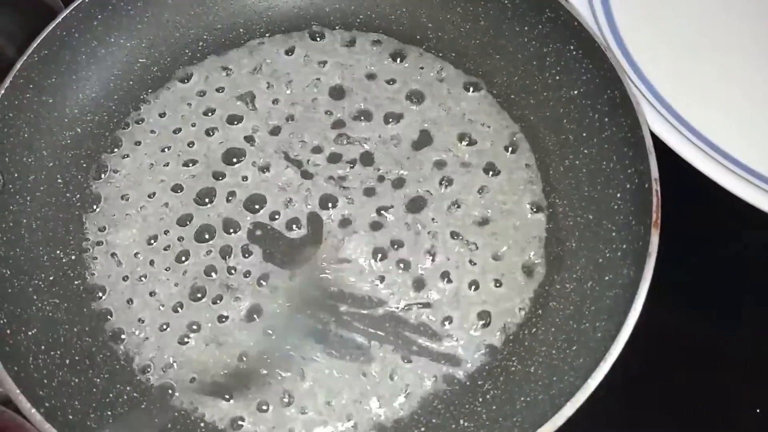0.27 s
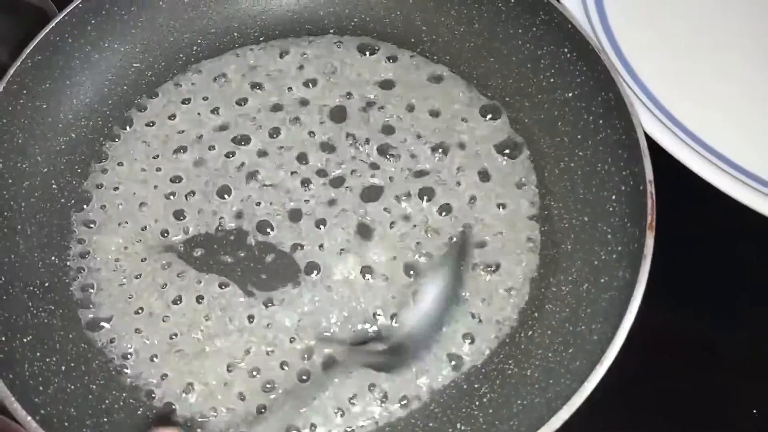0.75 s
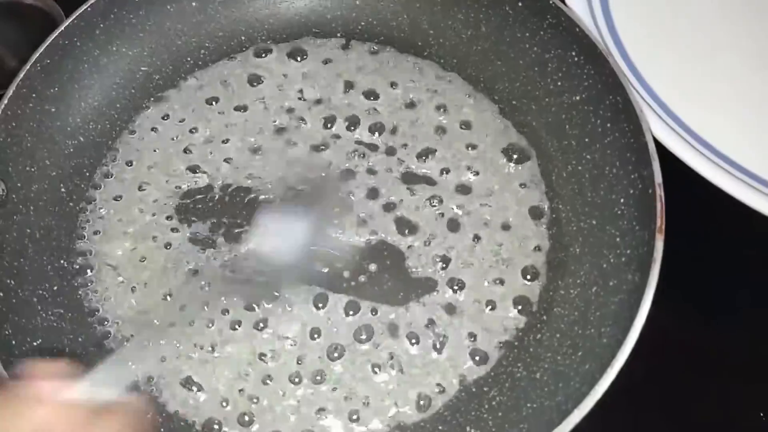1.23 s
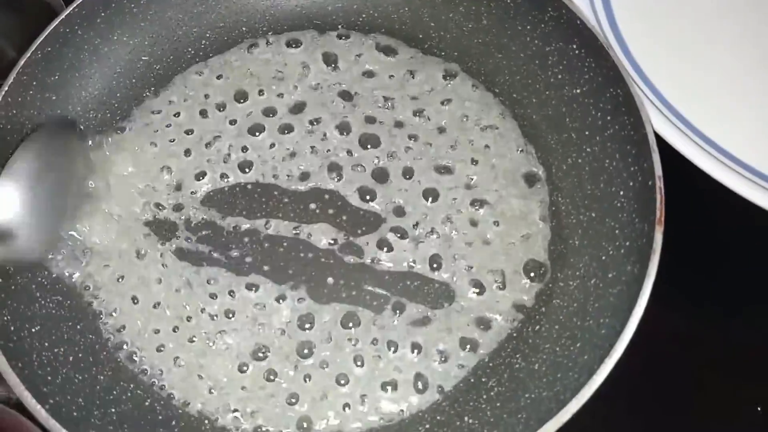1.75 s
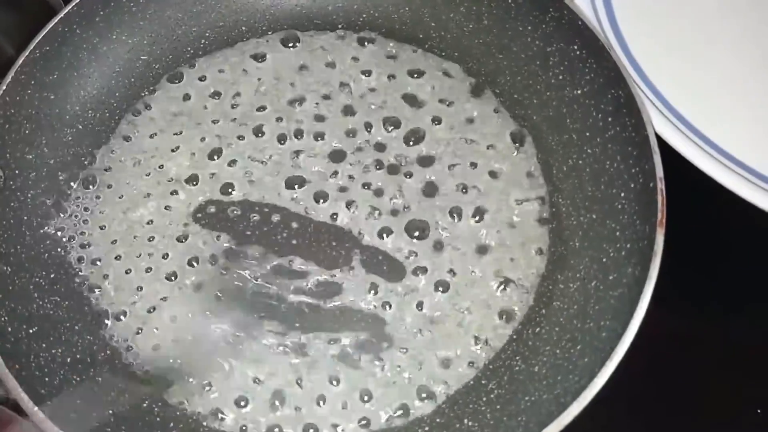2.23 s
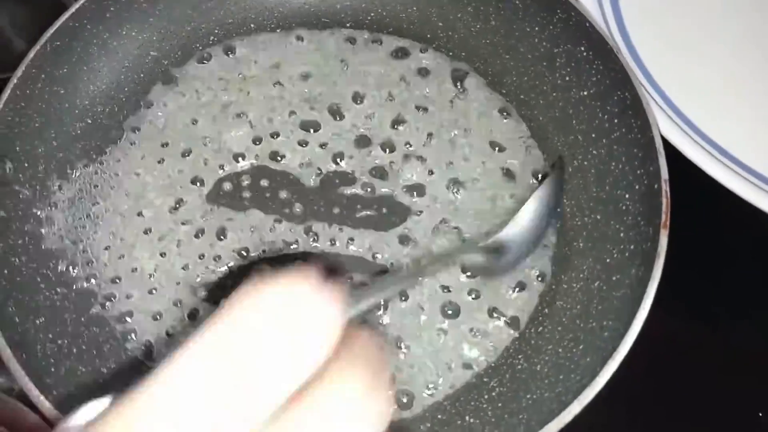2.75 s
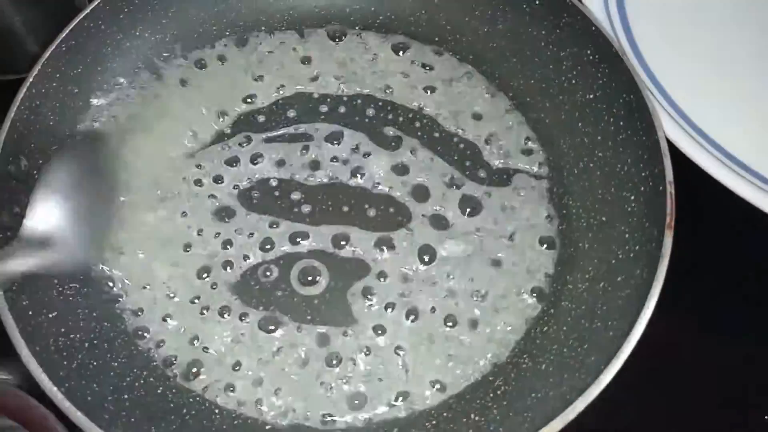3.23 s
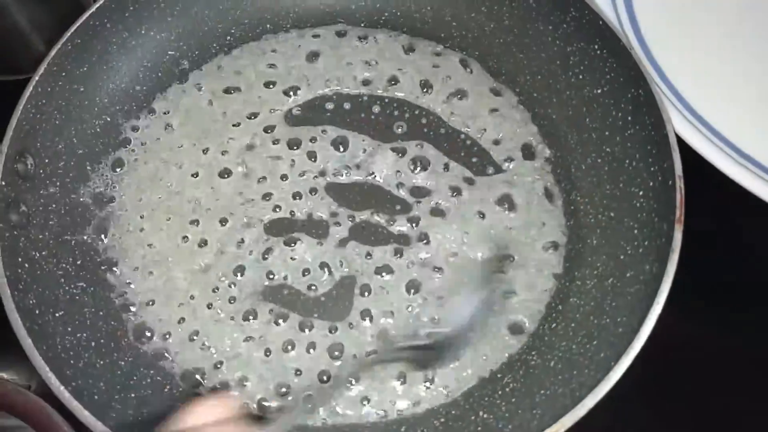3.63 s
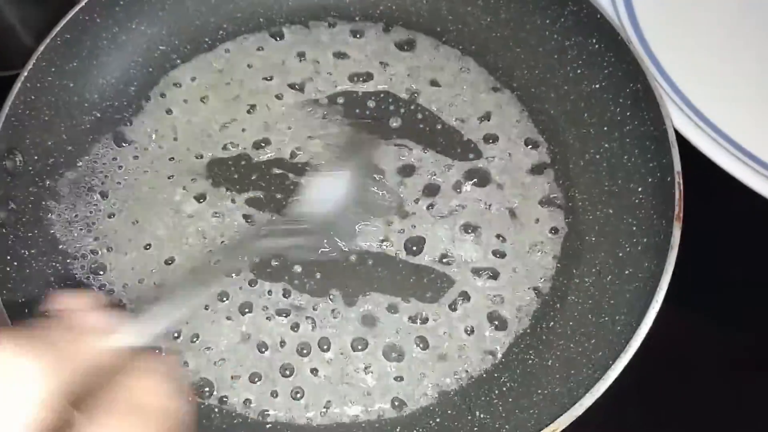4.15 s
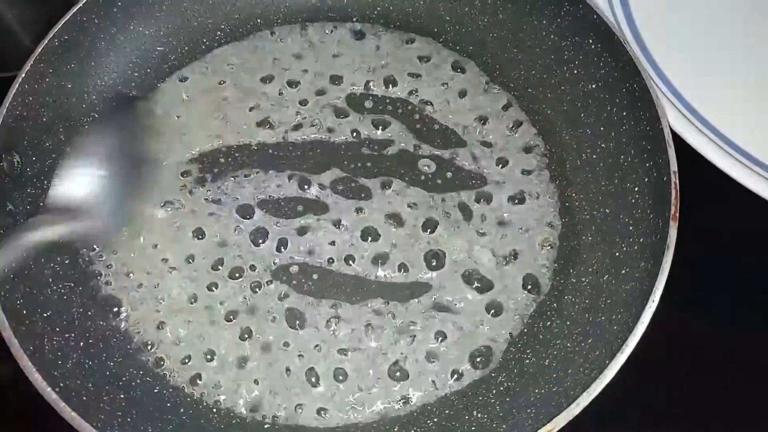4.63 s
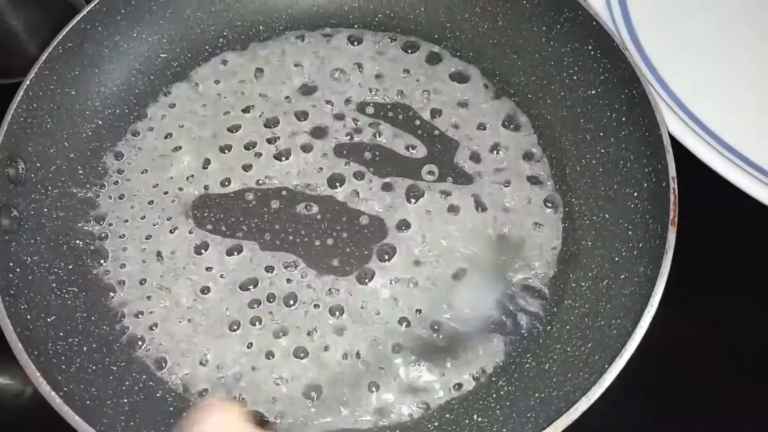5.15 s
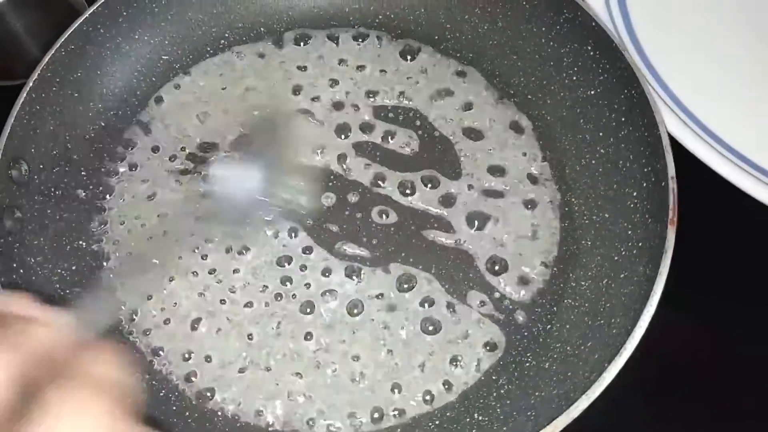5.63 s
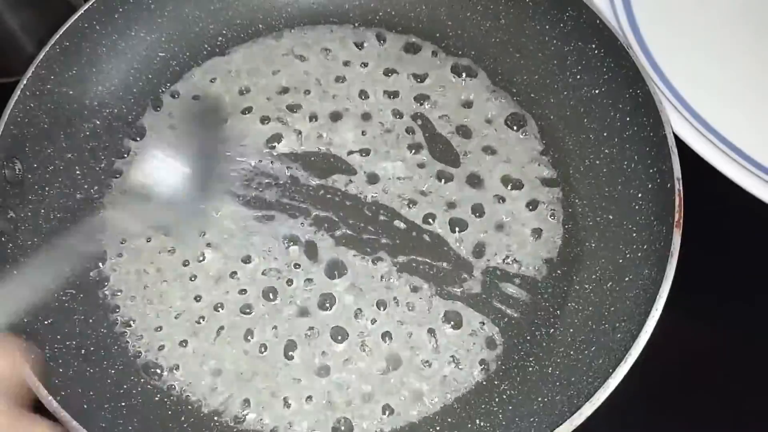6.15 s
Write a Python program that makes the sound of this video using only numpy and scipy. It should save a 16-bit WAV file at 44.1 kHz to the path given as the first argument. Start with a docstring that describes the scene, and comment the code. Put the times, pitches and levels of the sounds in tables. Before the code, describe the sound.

Fine bubbling sizzle runs throughout, with small pops. After a brief moment alone, it is joined by quick rhythmic spoon strokes: metallic ticks, hollow pan clacks and gritty rubbing, some firmer than others. Brittle grains tick under the spoon's edge. Near the end comes a rapid rattling judder, then more strokes. Close mono microphone, small room with very short reflections, little bass.

```python
"""Sugar syrup boils in a nonstick pan in a small kitchen, heard from close above in mono.
From the start countless tiny bubbles, modelled as filtered random clicks, burst in a steady sizzle. From 0.17 s,
about three times a second, a metal spoon lands on the pan or is dragged across it: blows and friction excite the
damped modes of pan and spoon. Sugar grains crack from 0.3 to 4.6 s, syrup on bared hot metal flares up
near 1.0, 1.9, 4.9, 5.1 and 5.6 s, and at 5.5 s the spoon judders down the pan wall."""
import sys
import numpy as np
from scipy import signal
from scipy.fft import rfft, irfft
from scipy.io import wavfile
from scipy.ndimage import uniform_filter1d, minimum_filter1d

SR = 44100
rng = np.random.default_rng(int(sys.argv[2]) if len(sys.argv) > 2 else 0)


def file_out(sig):
    """Save sig as 16-bit WAV at sys.argv[1]."""
    # one column per channel
    cols = np.atleast_2d(sig).T
    # limit, then scale
    lim = np.clip(cols, -1, 1)
    pcm = np.round(lim * 32767).astype(np.int16)
    wavfile.write(sys.argv[1], SR, pcm)


N = 281358  # samples

# In all tables levels are relative: sums, normalization and mixing gains follow.

# Spoon landings. Each row: start in seconds, pan thud in dB, wall clack in dB, spoon crack in dB,
# spoon ring in dB, chatter decay time (t60) in seconds.
LANDINGS = [(0.172, -24, -25, -1.5, -24, 0.022), (.511, -23.5, -26, -10, -16, 0.12),
            (.839, -8.5, -14, -8.5, -27, 0.036), (1.156, -14, -9, -4, -17, 0.029),
            (1.49, -13, -3, -33, -39, 0.01), (1.862, -20, -25, -7.5, -23, 0.073),
            (2.825, -1.5, -5, -2, -27, 0.0063), (4.012, -20, -33, -3.5, -11, 0.028),
            (4.316, -20, -13.5, -4.5, -18, 0.031), (4.743, -10, -43, -6, -25, 0.019),
            (5.118, -23, -30, 2.5, -13, 0.022), (5.560, -29, -38, -4, -10.5, 0.024),
            (5.921, -26.5, -23, -5, -11.5, 0.03), (6.327, -16, -12, -5.5, -14, 0.026)]
# Spectrum of the clack on the pan wall. Each row: frequency in Hz, spectral density in dB.
WALL_CLACK = [(70, -58), (220, -22), (1100, -24), (1400, 6), (1600, 3.5), (1900, -8), (2350, 4.5),
              (2800, -26), (3500, -2), (4200, -41), (9000, -44)]


def tapping(buzz_t60=0.31):
    """Impact excitation: each landing shares its blow between floor, wall and spoon, which buzzes on as it settles."""
    s, thud_db, clack_db, crack_db, ring_db, t60 = np.transpose(LANDINGS)
    thud = pan(contacts(zip(s, thud_db, t60), clean=0.11))
    clack = through(contacts(zip(s, clack_db, t60), clean=0.75), snap(WALL_CLACK))
    crack = spoon(contacts(zip(s, crack_db, t60)))
    # held loosely, the spoon chatters for longer than the landing itself
    buzz = contacts([(at, db, buzz_t60) for at, db in zip(s, ring_db)], clean=0.1)
    settling = through(buzz, ringing(SPOON_MODES))
    return thud + clack + crack + settling


# Strokes of the spoon across the pan. Each row: start in seconds, push in seconds, friction in dB,
# pan shudder in dB, extra sizzle in dB.
STROKES = [(0.176, .11, -29, -43, -25.5), (0.514, 0.063, -29, -43, -22), (.845, 0.085, -21.5, -37.5, -23.5),
           (1.158, 0.077, -22, -44.5, -20.5), (1.496, 0.12, -19, -41, -26), (1.864, .06, -26, -37, -22.5),
           (2.159, .11, -16.5, -39, -20.5), (2.473, 0.093, -22.5, -37, -22), (2.828, 0.26, -19, -38, -26),
           (3.290, 0.091, -26, -50.5, -28), (3.668, 0.14, -17, -37.5, -21), (4.020, 0.077, -24, -39.5, -39),
           (4.374, .18, -16, -41.5, -17.5), (4.746, .10, -20, -34.5, -22), (5.166, 0.13, -18, -37.5, -24.5),
           (5.565, .11, -25, -45.5, -24), (5.932, .15, -21, -42.5, -26.5), (6.328, 0.13, -19, -36, -8)]
# Brief catches of the dragged spoon. Each row: time in seconds, level in dB.
CATCHES = [(.606, -13), (1.520, -22), (1.918, -13.5), (2.188, -17), (4.768, -13), (4.837, -12),
           (5.661, -12)]
# Judder of the spoon down the pan wall. Each row: time in seconds, level in dB, decay time (t60) in seconds.
JUDDER = [(5.459, -7.5, 0.057), (5.468, -9, 0.1), (5.488, -7.5, 0.072), (5.503, -10.5, 0.074),
          (5.514, -3.5, 0.027), (5.523, -10, 0.23), (5.545, -19, 0.085)]
# Spectrum of the rasp on the wall. Each row: frequency in Hz, spectral density in dB.
WALL_RASP = [(100, -36), (500, -9.5), (1100, -13.5), (1500, 3), (2000, 0), (2550, 7), (3300, -9),
             (3900, 4.5), (5500, 1), (6600, -0.5), (7800, -28), (10000, -28), (16000, -38)]
# Modes of the whole pan on its support. Each row: frequency in Hz, energy in dB, decay time (t60) in seconds.
HOB_MODES = [(150, -27, 0.13), (187, -25, 0.12), (241.9, -12, 0.42), (298.6, -1.5, 0.29), (318, -5.5, 0.3),
             (404, -13, 0.2), (528, -9, 0.17)]
# friction grows as the spoon is pushed and dies as it lifts
BITE_S, PUSH_RISE_DB, LIFT_DB_PER_S = 0.0041, 14, 191
# the shudder eases slightly during the push and dies as the weight comes off
LOAD_S, LOAD_RISE_DB, UNLOAD_DB_PER_S = 0.01, -2.5, 152
# the boiling itself keeps the pan faintly ringing
PAN_IDLE_DB = -47.5


def dragging():
    """Stick-slip friction: random slips drive the pan's shell, while the spoon's weight shakes the pan on the hob."""
    _, _, friction_db, shudder_db, _ = np.transpose(STROKES)
    stroke_pressure = stroke_gain(friction_db, BITE_S, PUSH_RISE_DB, LIFT_DB_PER_S)
    pressure = np.hypot(stroke_pressure, from_db(PAN_IDLE_DB))
    weight = stroke_gain(shudder_db, LOAD_S, LOAD_RISE_DB, UNLOAD_DB_PER_S)

    slips = .85 * crackle(per_s=160, spread_db=1.5)
    rubbing = crackle(per_s=3000, spread_db=0.6)
    friction = (rubbing + slips) * pressure * from_db(-3 + 2.0 * drift(48))
    friction = friction + contacts([(s, db, .03) for s, db in CATCHES], clean=0.3)

    rumble = from_db(-2.0) * through(friction, snap(PAN_THUD))
    rings = from_db(-8.0) * wandering(friction, PAN_MODES, wander_db=3.0, rate=4.7)
    spoon_scrape = from_db(-11.5) * spoon(friction)
    # each mode of the supported pan gets its own random drive
    shudder = sum(from_db(db) * resonate(crackle(per_s=980, spread_db=2.0) * weight, hz, t60)
                  for hz, db, t60 in HOB_MODES)
    judder = through(contacts(JUDDER), snap(WALL_RASP))
    return rumble + rings + spoon_scrape + shudder + judder


def stroke_gain(levels_db, attack_s, rise_db, release_db_per_s):
    """Incoherent summation: strokes set in fast, move by rise_db to their level, then decay; their powers add."""
    age, power = np.arange(SR) / SR, np.zeros(N + SR)
    for (start, push_s, *_), level_db in zip(STROKES, levels_db):
        push_db = -rise_db * np.clip(1 - age / push_s, 0, 1) ** 1.1
        release_db = -release_db_per_s * np.maximum(age - push_s, 0)
        attack = np.clip(age / attack_s, 0, 1)
        first = round(start * SR)
        power[first:first + SR] += (attack * from_db(level_db + push_db + release_db)) ** 2
    return np.sqrt(power[:N])


# Spectrum of the pan's dull thud. Each row: frequency in Hz, spectral density in dB.
PAN_THUD = [(60, -82), (130, -70), (200, -56), (330, -38), (580, -15), (760, 4), (1150, 2.5), (1550, 7),
            (1950, -8.5), (2300, 9.5), (2700, -25), (5500, -48.5), (7000, -44), (9000, -96)]
# Modes of the pan's ringing shell. Each row: frequency in Hz, energy in dB, decay time (t60) in seconds.
PAN_MODES = [(710, -21.5, .12), (732.7, 2.5, 0.16), (763, -2, 0.18), (799.4, -2, 0.15), (844, -4, 0.066),
             (926.5, -3.5, 0.22), (1486, -33.5, 0.24), (1503, -8, 0.11), (1570, -10.5, 0.12),
             (2013, -33, 0.17), (2309, -3, 0.13), (2490, -11.5, .15), (2900, -14, 0.31), (3447, -8, 0.038)]


def pan(force, ring_db=7.5):
    """Modal superposition: the pan answers a force with a dull thud and its ringing modes."""
    return through(force, unit_energy(snap(PAN_THUD) + from_db(ring_db) * ringing(PAN_MODES)))


# Spectrum of the spoon's bright crack. Each row: frequency in Hz, spectral density in dB.
SPOON_CRACK = [(70, -53), (220, -32), (700, -25.5), (3000, -14.5), (4100, -4.5), (4700, 3.5), (5700, 4.5),
               (6600, 0), (7400, -17), (9000, -27), (14000, -30), (15500, -29)]
# Modes of the spoon's bowl and handle. Each row: frequency in Hz, energy in dB, decay time (t60) in seconds.
SPOON_MODES = [(4330, -7.5, 0.27), (4855, 7, 0.19), (4753, -7.5, 0.15), (5380, 5.5, 0.12),
               (5650, -4.5, 0.14), (5790, -34, 0.037), (5750, 2, 0.11), (6640, -3, 0.072),
               (6970, -12.5, 0.12), (7100, -55, 0.037), (8700, -55, 0.14)]


def spoon(force, ring_db=-11.0):
    """Modal superposition: the spoon answers with a bright crack and a short ring, damped by the hand."""
    return through(force, unit_energy(snap(SPOON_CRACK) + from_db(ring_db) * ringing(SPOON_MODES)))


# Sugar grains under the spoon's edge. Each row: time in seconds, crack level in dB.
GRAINS = [(.316, -18.5), (.996, -18), (1.629, -21), (2.248, -13), (3.147, -16), (3.588, -14), (3.608, -19),
          (3.639, -13), (3.708, -16.5), (3.784, -16), (3.795, -11.5), (4.083, -29), (4.134, -19),
          (4.590, -17), (4.607, -17.5)]
# Modes of the spoon's thin edge. Each row: frequency in Hz, energy in dB, decay time (t60) in seconds.
EDGE_MODES = [(8800, -20, .07), (9920, -10.5, 0.18), (10920, -4.5, 0.066), (11900, -22, .06),
              (12230, -3.5, 0.1), (12300, -26, .1), (13044, -9, 0.14), (14600, -5, .07),
              (15095, -17, 0.073), (15490, 3, .07)]
# Spectrum of the edge's scratch. Each row: frequency in Hz, spectral density in dB.
EDGE_SCRATCH = [(6000, -47), (8500, -2), (10500, 2), (12500, 9), (13800, -7), (15300, 4.5)]
# how strongly a grain's crack drives the spoon's bowl, and a landing its edge
GRAIN_TO_BOWL_DB, LANDING_TO_EDGE_DB = 7.5, -23


def grains():
    """Brittle fracture: grains crack and crumble, so the edge scratches and tinkles; landings make it tinkle too."""
    crack = contacts([(s, db, .012) for s, db in GRAINS], clean=0.31)
    crumble_force = contacts([(s, db - 11.5, .13) for s, db in GRAINS])
    crumble = crumble_force * crackle(per_s=2900, spread_db=5.0)
    landing = contacts([(s, crack_db + LANDING_TO_EDGE_DB, t60) for s, _, _, crack_db, _, t60 in LANDINGS])

    tinkle = from_db(-9.5) * wandering(crack + crumble + landing, EDGE_MODES, wander_db=5.5, rate=15)
    scratch = from_db(-6.5) * through(crack + crumble, snap(EDGE_SCRATCH))
    bowl = from_db(GRAIN_TO_BOWL_DB) * spoon(crack, ring_db=10.0)
    return tinkle + scratch + bowl


# Spectrum of the bursting bubbles. Each row: frequency in Hz, spectral density in dB.
BUBBLES = [(120, -93), (300, -83), (500, -22.5), (750, -15), (1200, -12.5), (1600, -7), (3300, -8),
           (4700, 0.5), (5700, 4), (6400, -1), (7200, -13), (8400, -29.5), (12500, -28.5), (14000, -27.5),
           (15400, -19)]
# Spectrum of syrup spread on hot metal. Each row: frequency in Hz, spectral density in dB.
FRESH_SYRUP = [(1200, -42), (2500, -4.5), (3050, 7.5), (3450, 12), (3950, 7), (4700, -4), (8000, -31)]
# the syrup simmers evenly, and is stirred into a livelier sizzle that soon calms down
SIMMER_DB, STIR_S, STIR_RISE_DB, CALM_DB_PER_S = -24, 0.0066, 11.5, 44


def syrup():
    """Shot noise: random bursts make a fine fizz with sparser, larger pops; spread syrup flares up at a lower pitch."""
    pops = crackle(per_s=450, spread_db=2.4)
    fizz = crackle(per_s=9000, spread_db=2.0)
    stirred = stroke_gain([sizzle_db for *_, sizzle_db in STROKES], STIR_S, STIR_RISE_DB, CALM_DB_PER_S)
    liveliness = np.hypot(from_db(SIMMER_DB), stirred) * from_db(1.1 * drift(17))
    bursts = (fizz + from_db(-9.5) * pops) * liveliness
    flare = crackle(per_s=7800, spread_db=2.0) * flare_gain()
    return from_db(-1.5) * through(bursts, snap(BUBBLES)) + through(flare, snap(FRESH_SYRUP))


# Flares of syrup on bare hot metal. Each row: loudest moment in seconds, time from there
# to about 11.5 dB lower in seconds, level in dB.
FLARES = [(1.01, 0.22, -23), (1.92, 0.26, -28), (4.87, 0.18, -25), (5.09, 0.091, -23), (5.63, 0.087, -27)]


def flare_gain():
    """Amplitude modulation: each flare swells and fades along a bell-shaped hyperbolic secant."""
    t = np.arange(N) / SR
    return sum(from_db(db) / np.cosh((t - s) / width_s * 2) for s, width_s, db in FLARES)


def kitchen(x, t60=0.12, wet_db=-13.5):
    """Diffuse reverberation: dulled, decaying noise stands for short reflections from worktop and walls."""
    dull = signal.butter(1, 6000, fs=SR, output="sos")
    tail = signal.sosfilt(dull, rng.standard_normal(SR // 2) * dying(t60))
    tail[:SR // 250] = 0  # reflections start 4 ms after the direct sound
    return x + from_db(wet_db) * through(x, unit_energy(tail))


def contacts(rows, clean=0.0089):
    """Chattering impact: each row (s, dB, t60) is a dying flurry of micro-contacts led by one clean blow.

    The share `clean` of the energy sets the leading blow."""
    force, clean = np.zeros(N + SR), np.clip(clean, 0, 1)
    for s, level_db, t60 in rows:
        blow = np.sqrt(1 - clean) * dying(t60) * rng.choice([-1, 1], SR // 2)
        blow[0] += np.sqrt(clean * np.sum(dying(t60) ** 2))
        start = max(round(s * SR), 0)
        force[start:start + SR // 2] += from_db(level_db) * blow
    return force[:N]


def crackle(per_s, spread_db):
    """Poisson-like impulse noise: random clicks, many small and a few large, scaled to an rms of 1."""
    excess = np.minimum(rng.exponential(1, N), 4.5)
    sizes = from_db(spread_db * excess) * rng.choice([-1, 1], N)
    return rms_one(sizes * (rng.random(N) < per_s / SR))


def wandering(force, modes, wander_db, rate):
    """Position-dependent excitation: a moving contact crosses the nodes and bellies of each mode."""
    return sum(from_db(db) * resonate(force * from_db(wander_db * drift(rate)), hz, t60)
               for hz, db, t60 in modes)


def resonate(x, hz, t60):
    """Damped oscillator: one mode of about unit energy, then confined to the band near its own pitch."""
    r, w = np.exp(-np.log(1000) / t60 / SR), 2 * np.pi * hz / SR
    drive = np.sqrt(2 * (1 - r * r)) * np.sin(w)
    swing = signal.lfilter([drive], [1, -2 * r * np.cos(w), r * r], x + 1e-18)
    band = [hz / 1.3, min(hz * 1.3, .45 * SR)]
    return signal.lfilter(*signal.butter(1, band, "band", fs=SR), swing)


def ringing(modes):
    """Modal superposition: the impulse response of a set of modes, at unit energy."""
    click = signal.unit_impulse(SR // 2)
    return unit_energy(sum(from_db(db) * resonate(click, hz, t60) for hz, db, t60 in modes))


def snap(colour, size=4096):
    """Minimum phase: the most compact causal impulse response with this spectrum, by folding the cepstrum."""
    hz, level_db = np.transpose(colour)
    bins = np.maximum(np.arange(size // 2 + 1) * SR / size, 1)
    magnitude = from_db(np.interp(np.log(bins), np.log(hz), level_db))
    cepstrum = irfft(np.log(magnitude))
    cepstrum[1:size // 2] *= 2
    cepstrum[size // 2 + 1:] = 0
    response = irfft(np.exp(rfft(cepstrum)))
    return unit_energy(np.pad(response, (0, SR // 2 - size)))


def drift(rate):
    """Low-pass noise: smooth chance with a spread of 1, changing about rate times a second."""
    r = np.exp(-80 * np.pi * rate / SR)  # one step lasts 40 samples
    steps = rng.standard_normal(N // 40 + 2002)
    slow = signal.lfilter([1], [1, -2 * r, r * r], steps)[2000:]  # skip the filter's start-up
    return np.interp(np.arange(N) / 40, np.arange(len(slow)), rms_one(slow))


def dying(t60):
    """Exponential decay: half a second that falls by 60 dB in t60 seconds."""
    return np.exp(-np.log(1000) * np.arange(SR // 2) / SR / max(t60, 1e-3))


def through(x, response):
    """Linear convolution: pass a signal through an impulse response."""
    return signal.oaconvolve(x, response)[:len(x)]


def unit_energy(x):
    """Energy normalization: scale an impulse response so that white noise keeps its level through it."""
    return x / np.sqrt(np.sum(x ** 2) + 1e-20)


def rms_one(x):
    """Power normalization: scale to an rms of 1."""
    return x / np.sqrt(np.mean(x ** 2) + 1e-20)


def from_db(db):
    """Logarithmic level: decibels to amplitude gain."""
    return 10 ** (np.asarray(db) / 20)


def scene():
    """Superposition: all sources add at one microphone, given to two identical channels."""
    return np.stack([kitchen(syrup() + dragging() + tapping() + grains())] * 2)


CUTOFF_HZ = 15900


def record(dry):
    """Peak limiting and band limiting: peaks are held, deep bass and the top cut, a faint low noise floor added."""
    # the lowest gain nearby, smoothed, keeps peaks within full scale ahead of the filters
    needed = 1 / np.maximum(abs(dry), 1)
    gain = uniform_filter1d(minimum_filter1d(needed, size=35), size=35)
    sound = signal.sosfilt(signal.butter(3, 150, "high", fs=SR, output="sos"), dry * gain)
    low_noise = signal.lfilter(*signal.butter(2, 200, fs=SR), rng.standard_normal(N))
    floor = from_db(-80) * rms_one(low_noise)
    return signal.sosfilt(signal.ellip(12, .1, 80, CUTOFF_HZ, fs=SR, output="sos"), sound + floor)


dry = scene()
out = record(dry)
file_out(out)
```